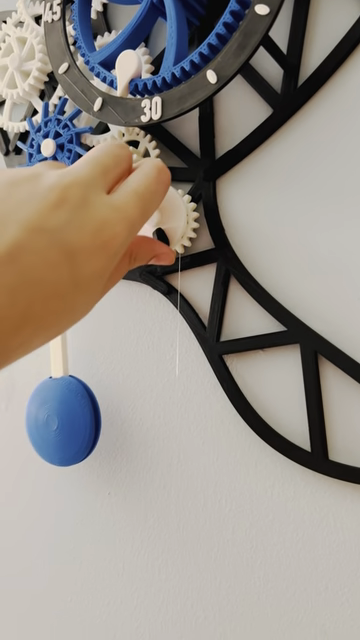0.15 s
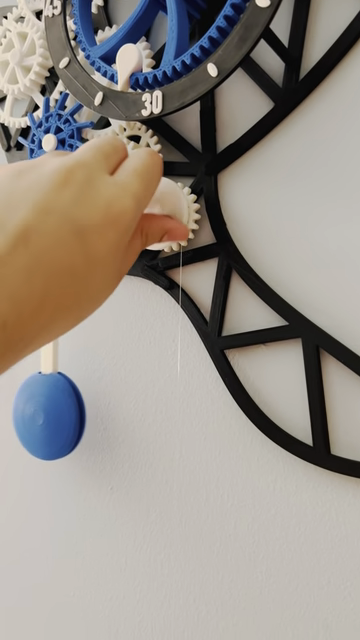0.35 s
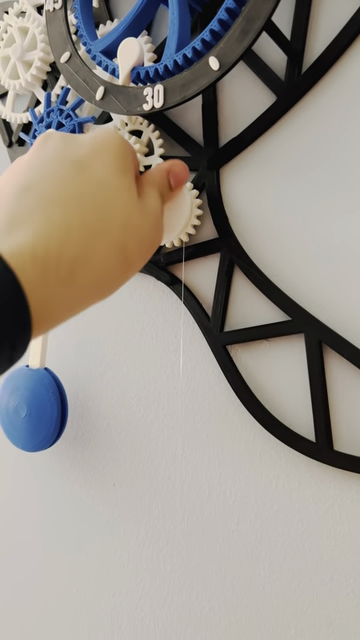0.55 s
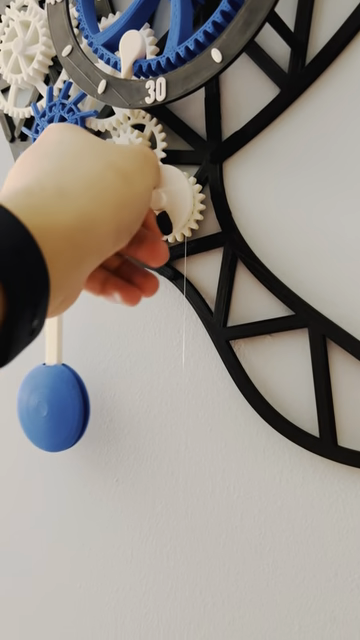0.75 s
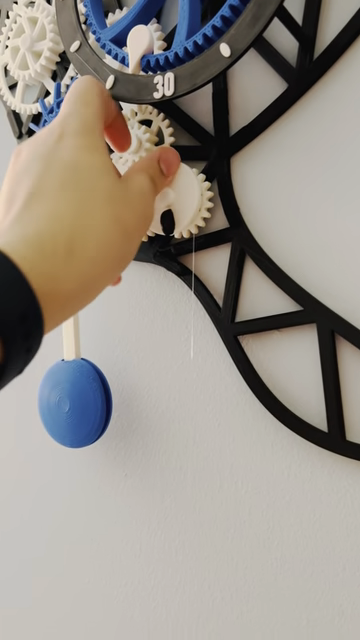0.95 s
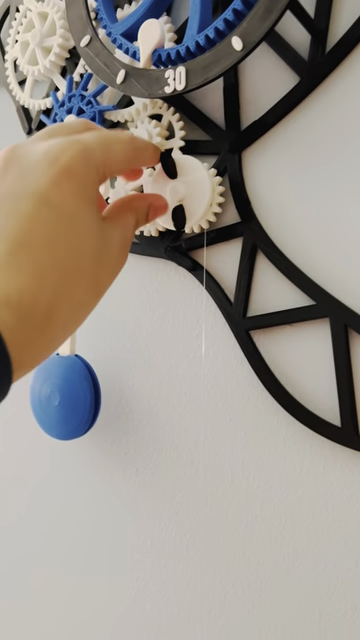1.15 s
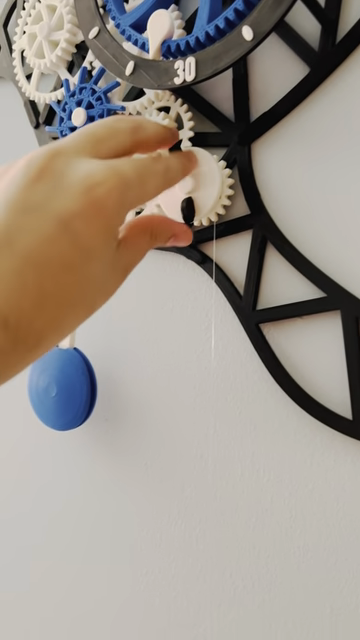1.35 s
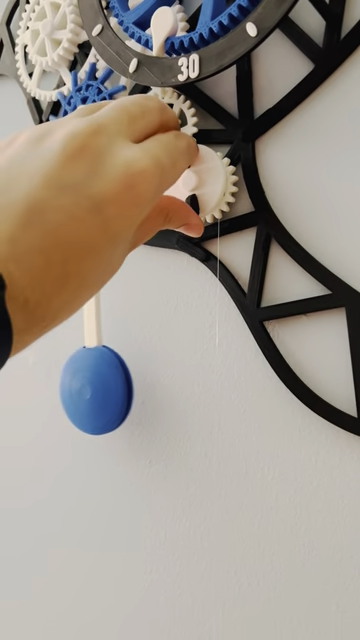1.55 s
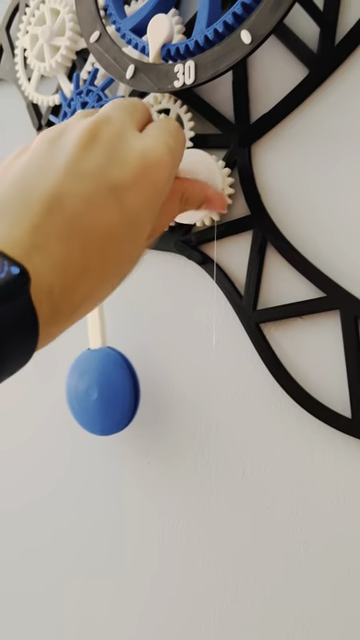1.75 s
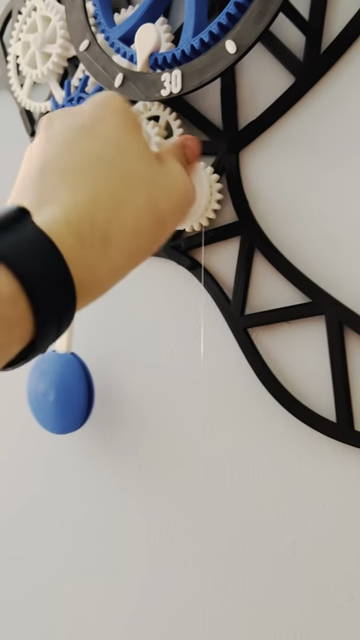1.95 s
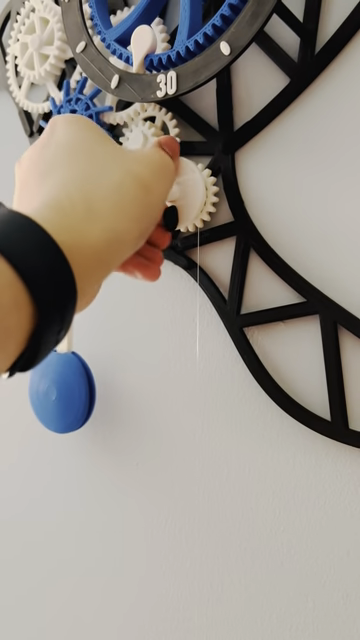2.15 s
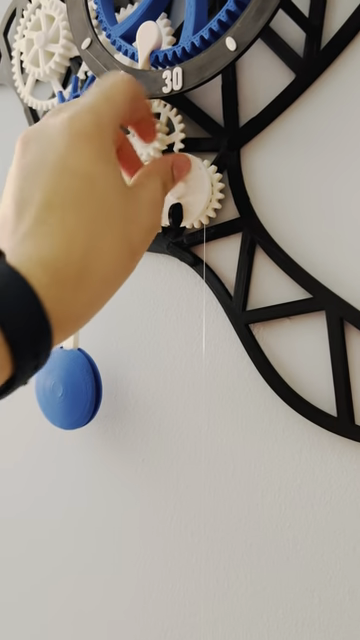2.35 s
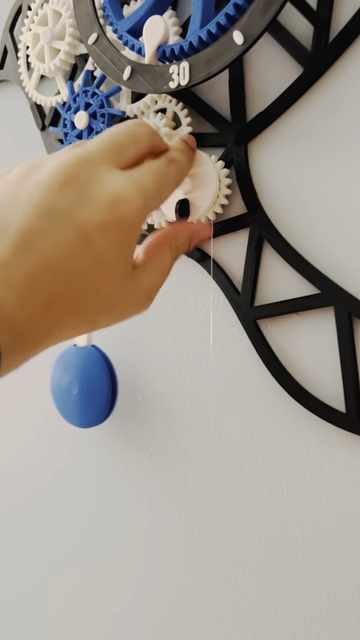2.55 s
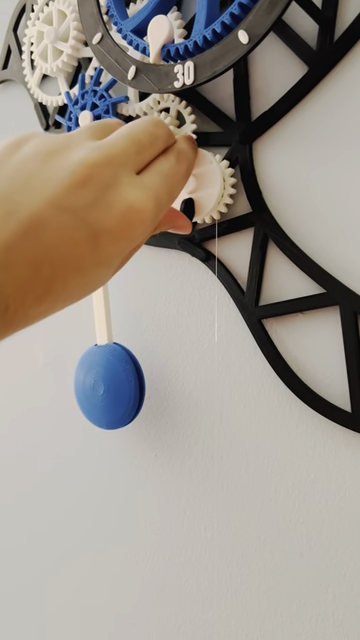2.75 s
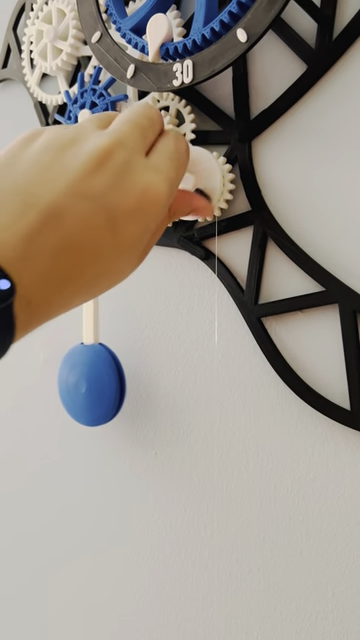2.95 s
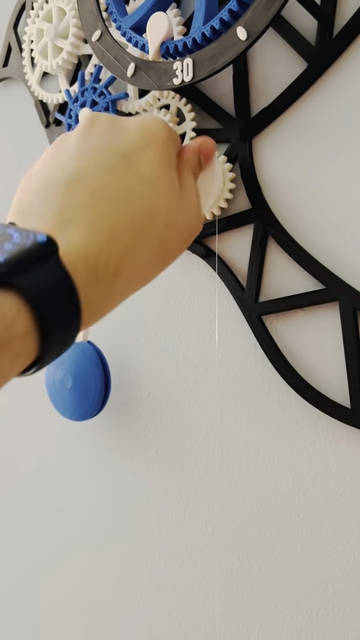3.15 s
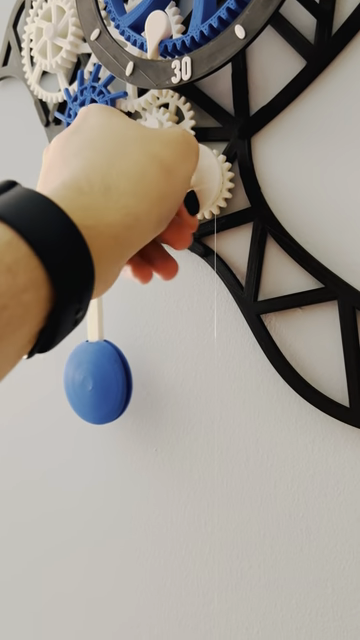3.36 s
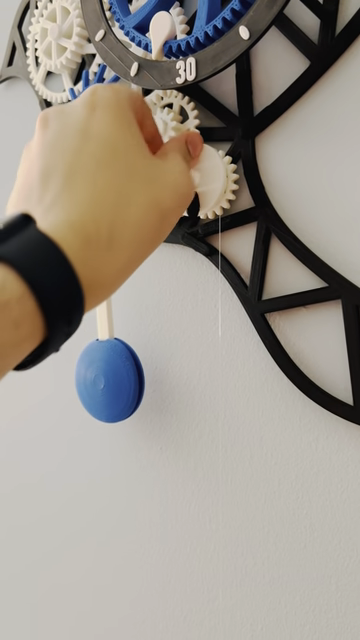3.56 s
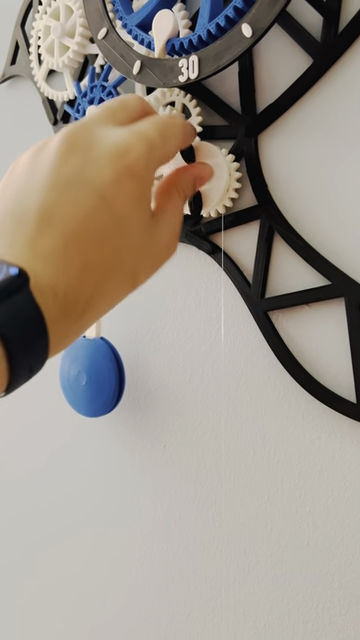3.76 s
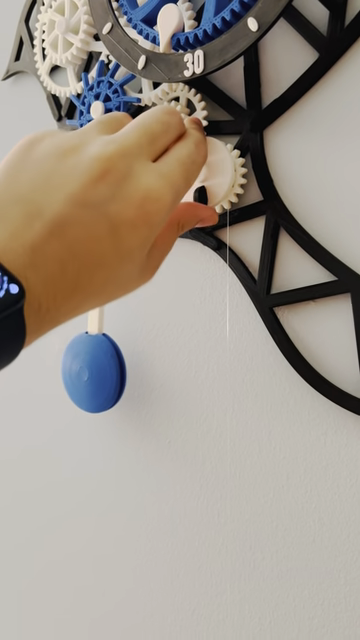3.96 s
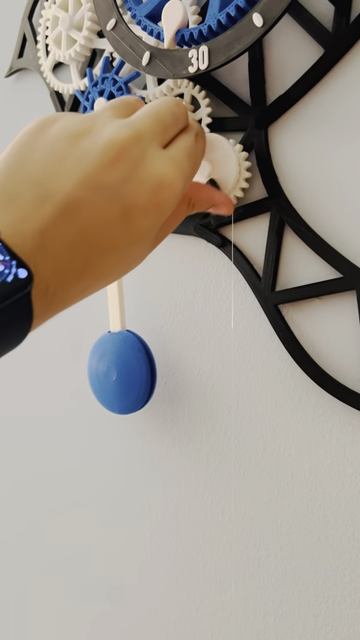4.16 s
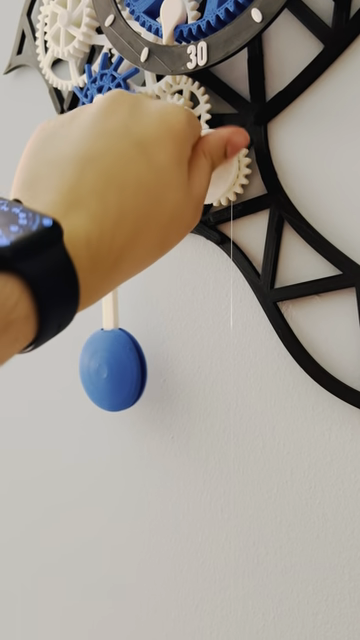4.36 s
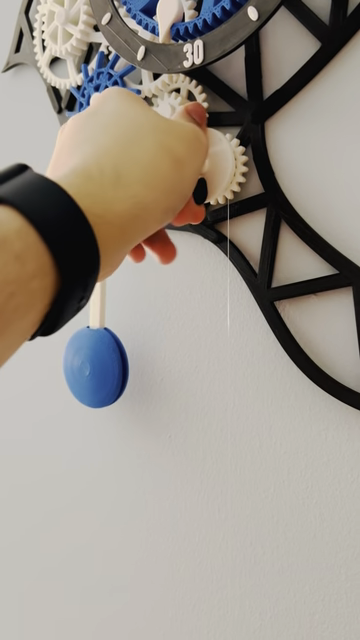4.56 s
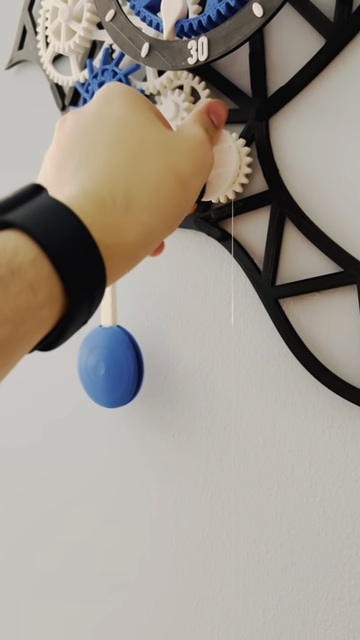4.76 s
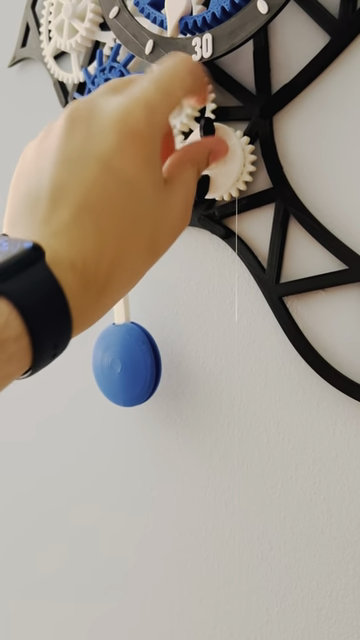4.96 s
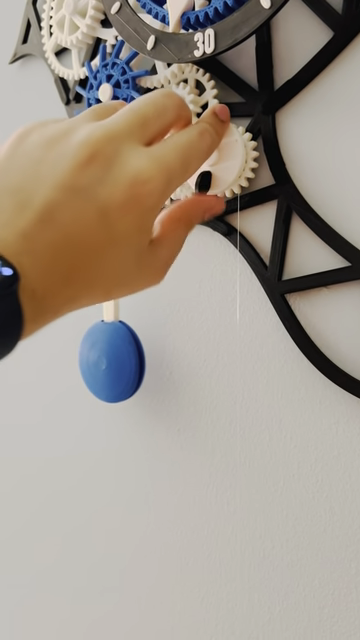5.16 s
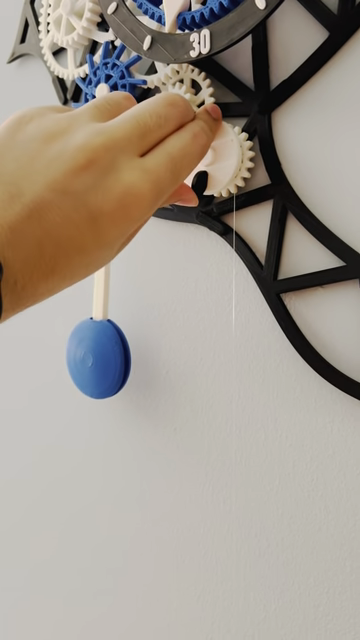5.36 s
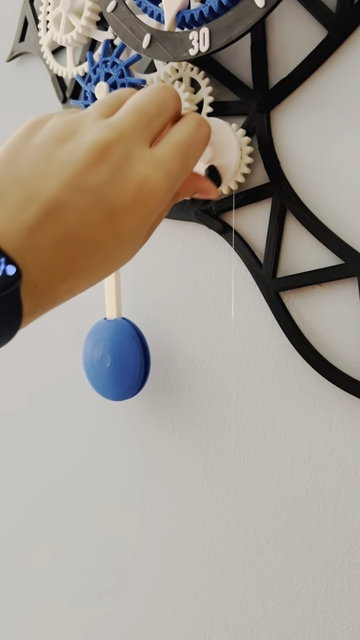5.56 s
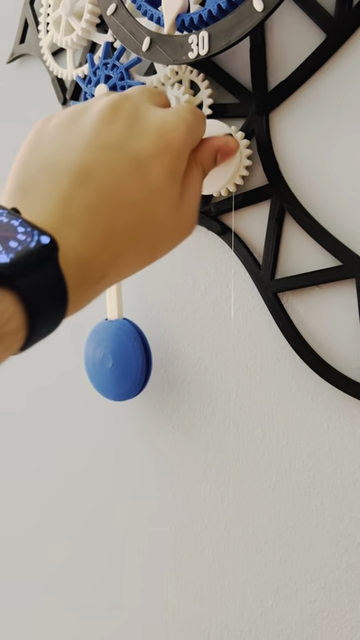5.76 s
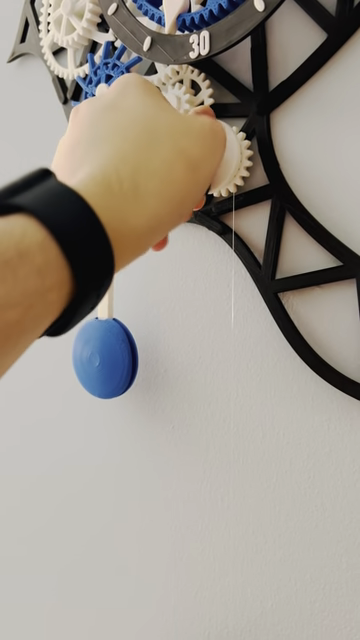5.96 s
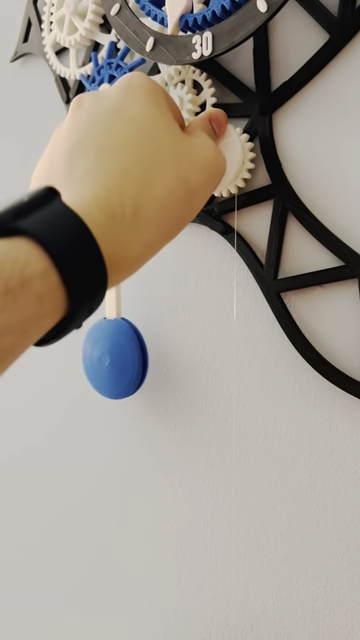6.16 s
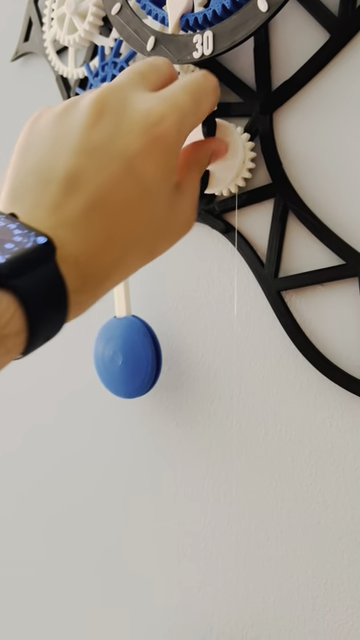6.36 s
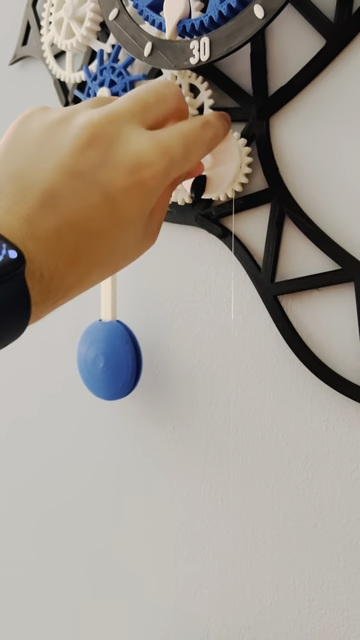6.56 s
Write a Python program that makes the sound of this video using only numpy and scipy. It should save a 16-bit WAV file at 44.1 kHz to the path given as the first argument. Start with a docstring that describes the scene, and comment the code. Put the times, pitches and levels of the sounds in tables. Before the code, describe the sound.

Five short bursts of bright plastic clicking, each under half a second, are separated by pauses of roughly three quarters of a second. Each click is a tiny double snap with a brief ring. Fingers knock and faintly rub the key, the frame thuds softly on the wall, and a weak tick sits beneath. Close phone pickup, small room, low murmur.

```python
"""Winding a plastic pendulum clock

A plastic wall clock is wound by hand, close to a phone in a small room. In each of five turns of the key
a pawl clicks over about ten ratchet teeth: bursts of tiny impacts make its slip, scrape and landing,
and fading tones make the wheel ring. Fingers knock and rub on the key, gears jostle, the frame rumbles
and the escapement ticks faintly. Filtered noise makes the room's murmur and its echoes."""
import sys
import numpy as np
from scipy import signal
from scipy.fft import rfft, irfft, next_fast_len
from scipy.io import wavfile
from scipy.ndimage import uniform_filter1d

SR = 44100
rng = np.random.default_rng(int(sys.argv[2]) if len(sys.argv) > 2 else 0)


def log_audio(samples):
    """Write samples as a 16-bit WAV file to the path given in sys.argv[1]."""
    # one column per channel
    frames = np.atleast_2d(samples).T
    # limit to full scale, then quantise
    limited = np.clip(frames, -1, 1)
    pcm = np.round(limited * 32767).astype(np.int16)
    wavfile.write(sys.argv[1], SR, pcm)


N = 291501

# Event levels are relative: each layer adds its own trim. Colour tables give only the shape of a spectrum.
# still air of the room: pitch_hz, level_db (per Hz)
AIR_COLOUR = [(25, -16), (50, 1), (105, 0), (160, -5), (250, -16), (400, -26), (700, -30), (1400, -41),
              (2100, -32), (3200, -46), (5000, -49), (7500, -45), (10000, -54), (16000, -63)]
# beats of the escapement: start_s, click_db, thump_db
TICK_EVENTS = [(0.114, -31.5, -10), (1.238, -32.5, -12), (2.416, -33, -14.5), (2.702, -35, -10),
               (3.829, -36.5, -12), (5.309, -41.5, -18.5)]
# bright rattle of the escape wheel: pitch_hz, level_db
ESCAPE_WHEEL_COLOUR = [(3000, -24.5), (6500, -8), (7200, -2), (7750, 7.5), (8400, -5.5), (10000, -4.5),
                       (11500, -17)]
# sharp click of a light contact: pitch_hz, level_db
CLICK_COLOUR = [(1500, -27.5), (4000, -11.5), (7500, 1.5), (10000, -5.5), (12000, -12), (15000, -17)]
# duller, hollow clack of a light contact: pitch_hz, level_db
CLACK_COLOUR = [(200, -8.5), (400, -4), (580, -0.5), (1000, 1), (1450, -8.5), (2400, -1), (4000, -17.5),
                (8000, -24)]
# boom of the frame against the wall: pitch_hz, level_db
THUMP_COLOUR = [(33, -26.5), (58, -3), (90, -2), (150, 1.5), (280, -1), (440, -14), (950, -37.5)]
# lowest swings of the frame: pitch_hz, level_db, fade_s (time to fall by 60 dB)
SWING_MODES = [(55.43, -1, 0.17), (102.4, 1.5, 0.17), (152.1, 1.5, 0.21), (201.1, -7.5, 0.11)]
# how long echoes last: pitch_hz, fade_s (a band with a value below zero is practically silent)
ECHO_FADE = [(150, -0.29), (600, 0.41), (2500, 0.28), (7000, 0.4528), (9500, 0.28), (14000, 0.25)]
# colour of the echoes: pitch_hz, level_db
ECHO_COLOUR = [(100, 2.5), (400, 2.5), (1500, 1), (3000, 3), (7000, -4.5), (14000, -1)]
# how unlike the echoes are at the two ports: pitch_hz, side_minus_mid_db
ECHO_WIDTH = [(100, -18), (300, -8), (600, 2), (1100, 1), (1800, -3), (2800, 0), (4500, -4), (7000, -3),
              (14000, -2)]
# key and gears knocking in their play: start_s, click_db, clack_db, thump_db
KNOCK_EVENTS = [(0.251, -55.5, -32, -28), (0.661, -25.5, -16, -10), (0.797, -37, -25.5, -16.5),
                (0.938, -35, -31, -8), (1.11, -43, -54, -18.5), (1.342, -68, -43, -17.5),
                (1.597, -46.5, -33, -13), (1.699, -14.5, -33, -25.5), (2.186, -9.5, -20, -3),
                (2.247, -23.5, -24.5, -27), (3.409, -26, -24.5, -26), (3.554, -30, -52, -19.5),
                (3.627, -36, -28.5, -14), (4.06, -26, -46, -26.5), (4.168, -16.5, -30, -19),
                (4.695, -28, -19.5, -19.5), (4.926, -20.5, -24.5, -5.5), (5.48, -53.5, -35.5, -26.5),
                (6.085, -26, -18.5, -19), (6.228, -40, -26.5, -28), (6.321, -24.5, -17, -7)]
# lasting ring of the winding arbor: pitch_hz, level_db, fade_s
ARBOR_MODES = [(6920, -6, .36), (6910, -2, 0.19), (7190, -3, 0.3), (7600, -6.5, 0.23)]
# resonances of the key under a finger: pitch_hz, level_db, fade_s
KEY_MODES = [(2630, 0.5, .08), (3930, -3, .06), (5130, -4, .035), (6400, -2, .035)]
# the hand holds the key for one turn: start_s, end_s, rumble_db
GRIP_EVENTS = [(0.317, 1.305, -53.5), (1.696, 2.46, -49), (2.903, 3.875, -49), (4.154, 4.98, -52),
               (5.53, 6.373, -51)]
# colour of the frame's rumble under the hand: pitch_hz, level_db
RUMBLE_COLOUR = [(35, -21.5), (55, -0.5), (80, -1), (103, -0.5), (130, -5.5), (155, 2), (210, -4.5),
                 (285, -5.5), (420, -19.5), (800, -35.5)]
# one small jolt of the gears: pitch_hz, level_db
JOLT_COLOUR = [(120, -6), (270, 3), (420, -2.5), (700, -11.5), (1200, -16.5), (2700, -19), (6000, -27.5),
               (12000, -45)]
# the pawl lands behind a ratchet tooth: land_s, level_db
TOOTH_EVENTS = [(.3476, 7), (.3985, 9), (.4392, 9), (.483, 8.5), (.5289, 11.5), (.5756, 7), (.6212, 7.5),
                (.6602, 7), (.7066, 6.5), (1.7127, 7), (1.7508, 9), (1.7788, 3.5), (1.8158, 7),
                (1.844, 8.5), (1.8783, 8), (1.932, 6), (1.9798, 8.5), (2.0276, 7.5), (2.0941, -8),
                (2.8929, 6.5), (2.9385, 7.5), (2.9785, 8.5), (3.0127, 8.5), (3.0509, 9), (3.0873, 8),
                (3.1268, 8.5), (3.1719, 6), (3.2154, 5.5), (3.2614, 6.5), (3.3271, 2), (4.1873, 7),
                (4.2349, 6.5), (4.2763, 5.5), (4.3144, 6), (4.3564, 8.5), (4.402, 10.5), (4.4529, 9),
                (4.4975, 8), (4.5468, 3), (5.5522, 8), (5.5911, 8.5), (5.6315, 7.5), (5.6706, 8),
                (5.7175, 8), (5.7739, 8), (5.8266, 9.5), (5.8701, 9), (5.9096, 6), (5.955, 5)]
# crack of the pawl: pitch_hz, level_db
PAWL_COLOUR = [(200, -31), (1500, -20.5), (3600, -18.5), (4600, -7.5), (6000, -0.5), (6900, 6.5),
               (7400, 5.5), (8000, -3.5), (10300, -0.5), (12600, -6.5), (13800, -0.5), (15500, -4.5),
               (16500, -19)]
# damped resonances of the ratchet wheel: pitch_hz, level_db, fade_s
WHEEL_MODES = [(286, -4, 0.064), (375, -7, 0.12), (778, -8, 0.032), (875, -7.5, 0.021), (1218, -16, 0.031),
               (1888, -3.5, 0.023), (2400, 1.5, 0.01), (2710, 4.5, .01)]
# fingers sliding on the key: start_s, end_s, level_db, pitch_hz (centre)
RUB_EVENTS = [(1.097, 1.125, -60, 4500), (3.554, 3.584, -51.5, 4620), (3.694, 3.77, -71, 5100),
              (4.842, 4.941, -55.5, 4430), (6.499, 6.62, -73, 5750)]
# phase by which the left port leads: pitch_hz, phase_radians
PORT_LEAD = [(4600, 0), (5400, -1.1), (8000, -1.3), (16000, -1.6)]

HIT = 8192  # samples in one short impact sound
AGE = np.arange(HIT) / SR  # seconds since its start
AIR_DB = -56
# a loose part shifts in its bearing about this often
RATTLE_S = 0.003
# the arm keeps moving, so the pattern of echoes is renewed this often
ECHO_RENEW_S = 0.2
# the grip tightens, eases as the turn runs out, and is released
GRIP_ATTACK_S, GRIP_EASE_DB_PER_S, GRIP_RELEASE_S = 0.056, 10.5, 0.1
# small random knocks of the gears while the key is held; energy relative to the frame rumble
PLAY_PER_S, PLAY_DB, PLAY_SCATTER_DB = 22, 20, 4.5
# the wheel runs off centre, so the fall from slip to landing lengthens and shortens once a revolution
WHEEL_TEETH, LONGEST_FALL_TOOTH = 21, 4.5
FALL_S, FALL_SWING_S = 0.0059, 0.0035
# the more of the spring's energy goes into the landing, the less is heard in the slip
USUAL_LANDING_DB, SLIP_DB, SLIP_TRADE, SLIP_MAX_DB = 6, 2, 0.3, 4.5
# treble of the crack, its scatter from tooth to tooth, and the extra treble in the snap of the slip
BRIGHT_DB, BRIGHT_SCATTER_DB, SLIP_BRIGHT_DB = -0.2, 2, 1.5
# every landing shakes the wheel about equally
WHEEL_DB, HOLLOW_DB = -13.5, -18
TOP_HZ = 15900


def amp(db):
    """Turn decibels into gain."""
    return 10 ** (np.asarray(db) / 20)


def unit(x):
    """Scale a sound to an energy of one."""
    return x / np.sqrt(np.sum(x ** 2) + 1e-18)


def along(points, hz):
    """Read a table of (Hz, value) points on a log-frequency axis."""
    f, value = np.transpose(points)
    return np.interp(np.log(np.maximum(hz, 1)), np.log(f), value)


def colour(x, points):
    """Filter to a (Hz, dB) shape that falls away above its last point, without sounding ahead of time."""
    size = 2 * next_fast_len(len(x))
    hz = np.fft.rfftfreq(size, 1 / SR)
    db = along(points, hz) - 15 * np.log2(np.maximum(hz / points[-1][0], 1))
    # folding the cepstrum forward in time gives the filter its minimum phase
    cepstrum = irfft(np.log(amp(db)))
    cepstrum[1:size // 2] *= 2
    cepstrum[size // 2 + 1:] = 0
    response = np.exp(rfft(cepstrum))
    return irfft(rfft(x, size) * response)[:len(x)]


def fade(t, t60):
    """Die away by 60 dB in t60 seconds."""
    return np.exp(-np.log(1000) * t / np.maximum(t60, 1e-4))


def add(track, s, sound):
    """Mix a sound into a track at s seconds."""
    i = max(int(s * SR), 0)
    track[i:i + len(sound)] += sound[:max(N - i, 0)]


def chatter(rise_s, t60, grain_db):
    """A contact of ridged plastic: a quickly fading swarm of tiny impacts of uneven size."""
    push, size = rng.standard_normal((2, HIT))
    rise = 1 - np.exp(-(AGE / rise_s) ** 2)
    return unit(push * amp(grain_db * size) * fade(AGE, t60) * rise)


def ring(modes, scatter_db, detune, rattle=0):
    """Fading tones struck at a slightly different spot each time; a loose part's rattle blurs their pitch."""
    t = np.arange(int(SR * max(t60 for _, _, t60 in modes)) + 64) / SR
    chance = rng.standard_normal((len(modes), 3))
    wobble = rng.standard_normal((len(modes), 256))
    out = 0
    for (hz, db, t60), (louder, sharper, sign), w in zip(modes, chance, wobble):
        shake = rattle * np.interp(t, np.arange(len(w)) * RATTLE_S, w)
        pitch = hz * (1 + detune * sharper + shake)
        tone = unit(np.sin(2 * np.pi * np.cumsum(pitch) / SR) * fade(t, t60))
        out = out + amp(db + scatter_db * louder) * np.sign(sign) * tone
    return unit(out)


def air():
    """Steady low murmur of the room with a thin hiss, from coloured noise; returns mid and side."""
    mid, side = (colour(noise, AIR_COLOUR) for noise in rng.standard_normal((2, N)))
    side = colour(side, [(60, -24.5), (250, -8.5), (600, -4.5), (16000, -5)])
    return amp(AIR_DB) * np.array([mid, side]) / mid.std()


def knock(click_db, clack_db, thump_db):
    """A light contact: a sharp click, a hollow clack, and the frame swinging against the wall with a boom."""
    click = unit(colour(chatter(rise_s=0.0005, t60=0.017, grain_db=1.5), CLICK_COLOUR))
    clack = unit(colour(chatter(rise_s=0.0026, t60=0.088, grain_db=2.5), CLACK_COLOUR))
    boom = unit(colour(chatter(rise_s=0.008, t60=0.24, grain_db=1), THUMP_COLOUR))
    swing = np.pad(ring(SWING_MODES, scatter_db=2, detune=0.034), (0, HIT))[:HIT]
    swing = unit(swing * (1 - np.exp(-(AGE / 0.015) ** 2)))
    contact = amp(click_db) * click + amp(clack_db - 3.5) * clack
    return contact + amp(thump_db - 5) * boom + amp(thump_db - 4) * swing


def escapement():
    """The anchor stops the escape wheel, which rattles briefly on its arbor."""
    out = np.zeros(N)
    for s, click_db, thump_db in TICK_EVENTS:
        add(out, s, knock(click_db - 5.5, click_db, thump_db))
        rattle = colour(chatter(rise_s=0.0005, t60=0.11, grain_db=2), ESCAPE_WHEEL_COLOUR)
        add(out, s, amp(click_db + 2.5) * unit(rattle))
    return out


def room(x, wet_db, build_s):
    """Echoes build into a diffuse tail, each band dying at its own pace; returns mid and side."""
    t = np.arange(3 * HIT) / SR
    hz = np.fft.rfftfreq(len(t), 1 / SR)
    # overlapping bands, one around each frequency in the fade table
    bands = np.array([along([(f, f == centre) for f, _ in ECHO_FADE], hz) for centre, _ in ECHO_FADE])
    bands = bands * amp(along(ECHO_COLOUR, hz))
    build = 1 - np.exp(-(t / build_s) ** 2)
    decays = np.array([fade(t, t60) for _, t60 in ECHO_FADE]) * build
    hop = int(ECHO_RENEW_S * SR)
    out = np.zeros((2, N))
    # overlapping pieces of sound each get a fresh pattern of echoes
    for i in range(0, N, hop):
        piece = x[i:i + 2 * hop] * signal.windows.cosine(2 * hop)[:N - i]
        for channel in out:
            noise = rfft(rng.standard_normal(len(t)))
            tail = np.sum(irfft(noise * bands) * decays, axis=0)
            add(channel, i / SR, amp(wet_db) * signal.fftconvolve(piece, unit(tail)))
    return out[0], colour(out[1], ECHO_WIDTH)


def key_knocks():
    """The key and gears knock in their play, which sets the arbor and key ringing."""
    out = np.zeros(N)
    for s, click_db, clack_db, thump_db in KNOCK_EVENTS:
        add(out, s, knock(click_db, clack_db, thump_db))
        add(out, s, amp(click_db - 14.5) * ring(ARBOR_MODES, scatter_db=2, detune=0.014, rattle=0.014))
        add(out, s, amp(click_db - 12) * ring(KEY_MODES, scatter_db=5.5, detune=0.01, rattle=0.017))
    return out


def grip():
    """How hard the hand shakes the frame: a quick rise with each turn, a slow easing, then release."""
    t = np.arange(N) / SR
    force = np.zeros(N)
    for start, end, db in GRIP_EVENTS:
        tighten = np.clip((t - start) / GRIP_ATTACK_S, 0, 1)
        release = np.clip(1 - (t - end) / GRIP_RELEASE_S, 0, 1)
        force += tighten * release * amp(db - GRIP_EASE_DB_PER_S * (t - start))
    return force


def frame_rumble():
    """The holding hand makes the frame rumble: low noise that follows the grip."""
    rumble = colour(rng.standard_normal(N), RUMBLE_COLOUR)
    return grip() * rumble / rumble.std()


def gear_play():
    """The gears jostle at random under the hand, harder the tighter it grips."""
    out, force = np.zeros(N), grip()
    times = np.cumsum(rng.exponential(1, 256)) / PLAY_PER_S
    sizes = rng.standard_normal(256)
    for s, size in zip(times, sizes):
        if s * SR < N and force[int(s * SR)] > 0:
            jolt = unit(colour(chatter(rise_s=0.001, t60=0.04, grain_db=2), JOLT_COLOUR))
            add(out, s, force[int(s * SR)] * amp(PLAY_DB + PLAY_SCATTER_DB * size) * jolt)
    return out


def crack_colour(tooth_db, treble_db):
    """The pawl's crack shaped by one tooth, with treble raised or lowered from 6.5 to 13 kHz and above."""
    return [(hz, db + own + treble_db * np.clip(np.log2(hz / 6500), 0, 1))
            for (hz, db), own in zip(PAWL_COLOUR, tooth_db)]


def ratchet():
    """The pawl snaps off a tooth tip, scrapes down its flank, then lands and shakes the wheel and its arbor."""
    out = np.zeros(N)
    for tooth, (land_s, land_db) in enumerate(TOOTH_EVENTS):
        turn = 2 * np.pi * (tooth - LONGEST_FALL_TOOTH) / WHEEL_TEETH
        fall_s = FALL_S + FALL_SWING_S * np.cos(turn)
        hard_db = land_db - USUAL_LANDING_DB
        slip_db = min(SLIP_DB - SLIP_TRADE * hard_db, SLIP_MAX_DB)
        # no two teeth are shaped quite alike, so each colours the crack its own way
        bright_db = BRIGHT_DB + BRIGHT_SCATTER_DB * rng.standard_normal()
        tooth_db = 1.5 * rng.standard_normal(len(PAWL_COLOUR))
        shape = crack_colour(tooth_db, bright_db)
        slip_shape = crack_colour(tooth_db, bright_db + SLIP_BRIGHT_DB)

        # a dry snap as the tip lets go, and the pawl's short flutter after it
        snap = chatter(rise_s=0.00031, t60=0.005, grain_db=-1)
        flutter = chatter(rise_s=0.0014, t60=0.022, grain_db=0)
        slip = unit(colour(snap + amp(-2.5) * flutter, slip_shape))
        add(out, land_s - fall_s, amp(slip_db) * slip)
        scrape = unit(colour(chatter(rise_s=0.003, t60=0.015, grain_db=4.5), shape))
        add(out, land_s - 0.004, amp(land_db - 9.5) * scrape)

        # bounces go on for a few milliseconds; a hard, square landing settles sooner
        settle = amp(-0.9 * hard_db)
        bounces = chatter(rise_s=0.0011, t60=0.047 * settle, grain_db=-0.5)
        bounces = unit(bounces * np.exp(-(AGE / 0.008) ** 4))
        add(out, land_s - 0.0003, amp(land_db - 1.94) * unit(colour(bounces, shape)))
        wheel = signal.fftconvolve(bounces, ring(WHEEL_MODES, scatter_db=2.5, detune=0.028, rattle=0.022))
        add(out, land_s, amp(WHEEL_DB) * unit(wheel))
        add(out, land_s, amp(HOLLOW_DB) * unit(colour(bounces, CLACK_COLOUR)))
        arbor = ring(ARBOR_MODES, scatter_db=3.5, detune=0.009, rattle=0.0072)
        add(out, land_s, amp(land_db - 13.5) * arbor)
    return out


def key_rubs():
    """Fingers slide over the key: grainy noise as the skin catches and lets go, with some ring of the key."""
    out = np.zeros(N)
    for start, end, db, hz in RUB_EVENTS:
        count = max(int((end - start) * SR), 64)
        push, size = rng.standard_normal((2, HIT))
        catch_db = 32 * uniform_filter1d(size, size=100)  # changes every few milliseconds
        shape = [(hz / 10, -7), (hz / 3, -9), (hz, 0), (hz * 1.24, -7), (hz * 2.13, -8), (hz * 3, -24)]
        grains = colour(push * amp(catch_db), shape)[:count]
        key = ring(KEY_MODES, scatter_db=-6, detune=0.018, rattle=0.014)
        grains = grains + amp(-10) * signal.fftconvolve(grains, key)[:len(grains)]
        taper = signal.windows.tukey(len(grains), 0.5)
        add(out, start, amp(db) * grains / grains.std() * taper)
    return out


def scene():
    """Clock, room and air reach two closely spaced microphone ports, with a small phase lead between them."""
    air_mid, air_side = air()
    clock = escapement() + key_knocks() + frame_rumble() + gear_play() + ratchet() + key_rubs()
    echo, width = room(clock, wet_db=-9.5, build_s=0.0078)
    # reflections off the hand and the wall come in at a slant and differ between the ports
    reflections = chatter(rise_s=0.0005, t60=0.007, grain_db=0)
    slant = colour(signal.fftconvolve(clock, reflections)[:N], ECHO_WIDTH)
    mid = clock + echo + air_mid
    side = width + amp(-7.5) * slant + air_side
    size = next_fast_len(N + HIT, True)
    # half of the phase goes to each port, in opposite directions
    lead = np.exp(0.5j * along(PORT_LEAD, np.fft.rfftfreq(size, 1 / SR)))
    ports = rfft([mid + side, mid - side], size) * np.array([lead, lead.conj()])
    return irfft(ports, size)[:, :N]


def record(dry):
    """The phone drops the deepest bass and cuts the top."""
    thin = signal.sosfilt(signal.butter(4, 36, "high", fs=SR, output="sos"), dry)
    return signal.sosfilt(signal.ellip(8, 0.2, 70, TOP_HZ, fs=SR, output="sos"), thin)


dry = scene()
out = record(dry)
log_audio(out)
```